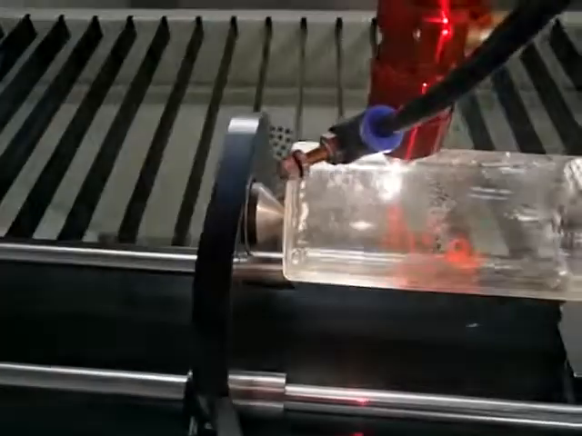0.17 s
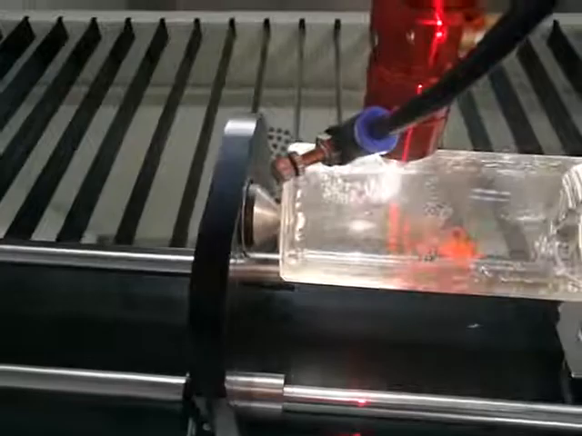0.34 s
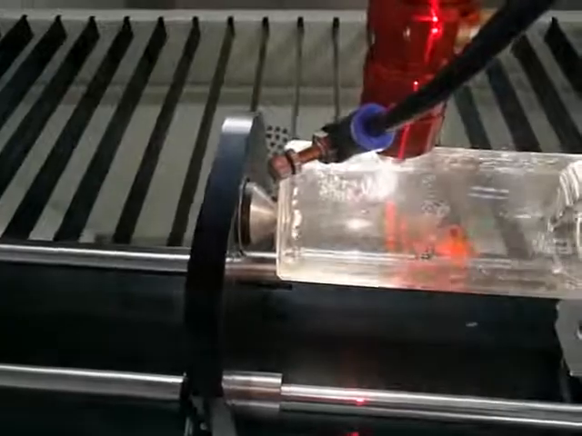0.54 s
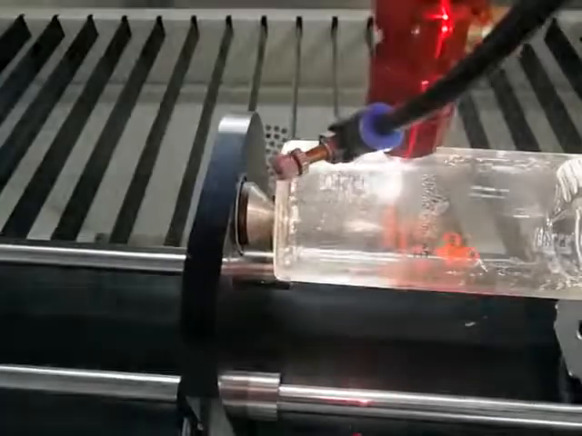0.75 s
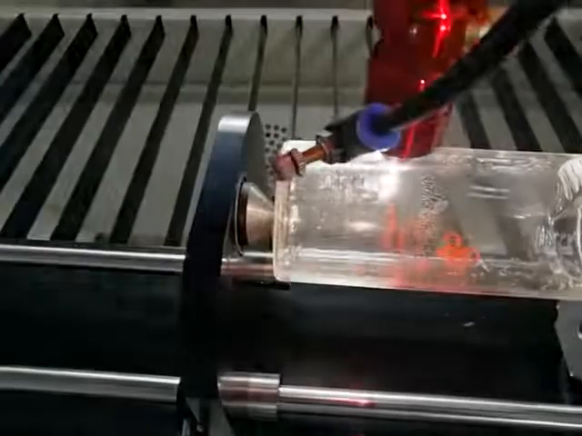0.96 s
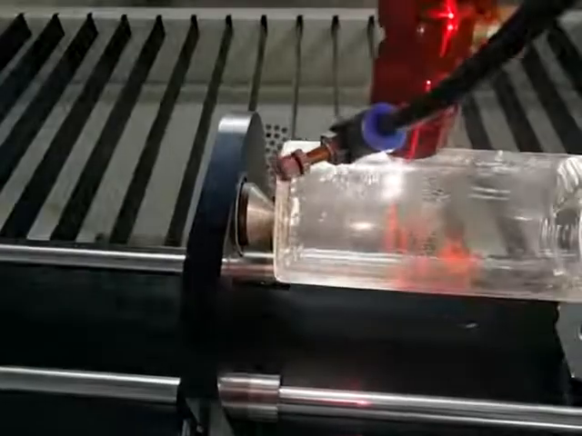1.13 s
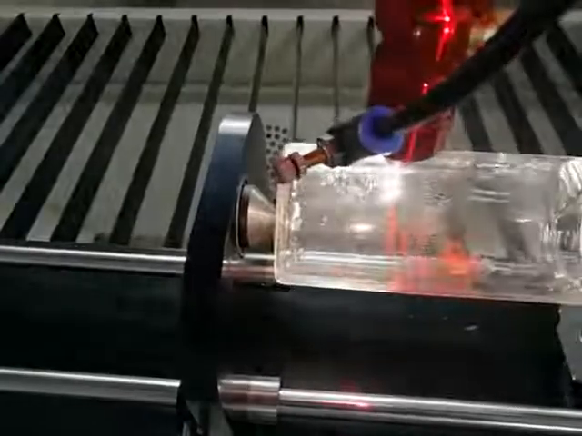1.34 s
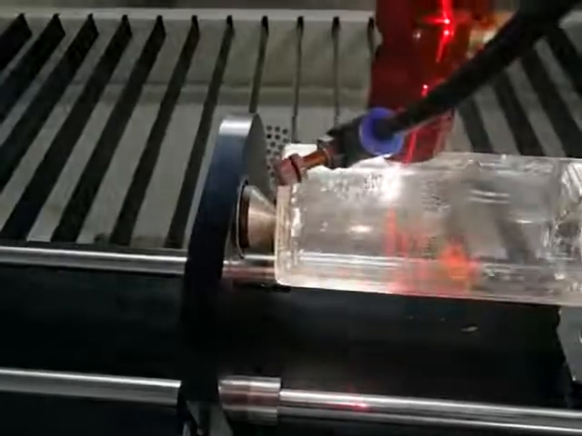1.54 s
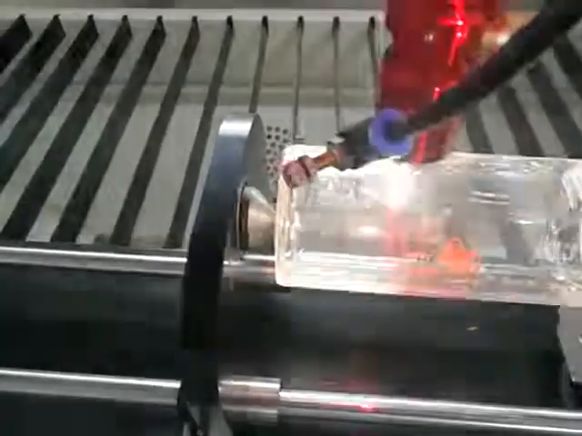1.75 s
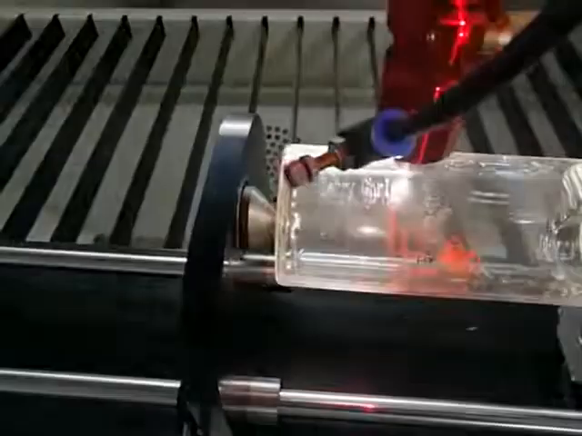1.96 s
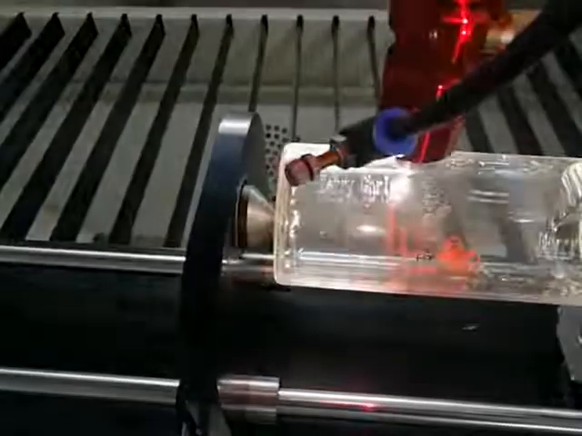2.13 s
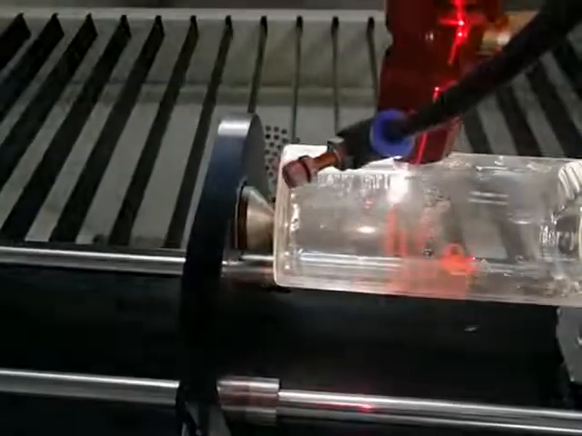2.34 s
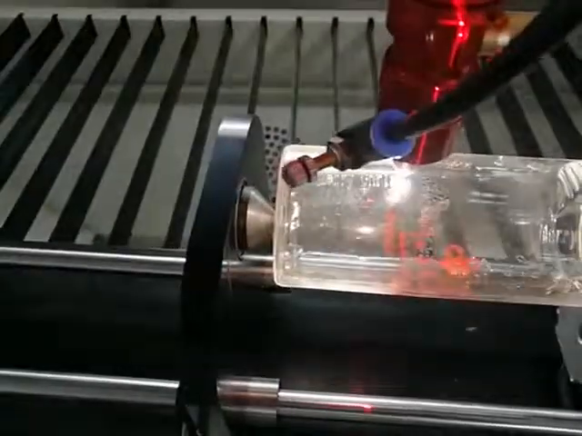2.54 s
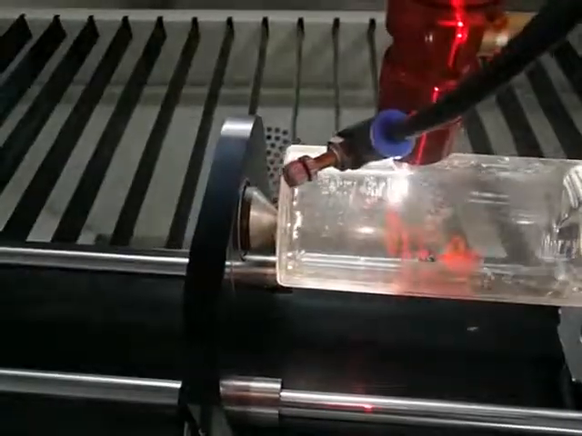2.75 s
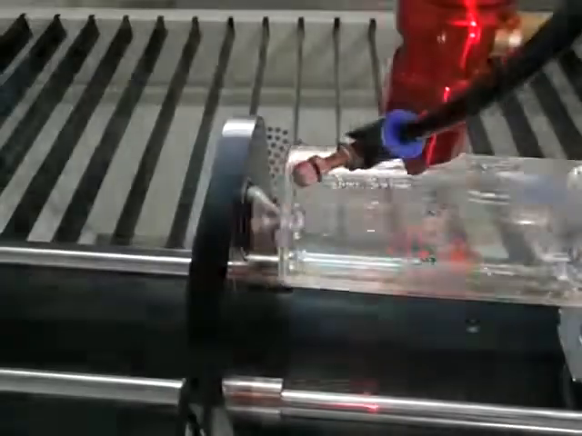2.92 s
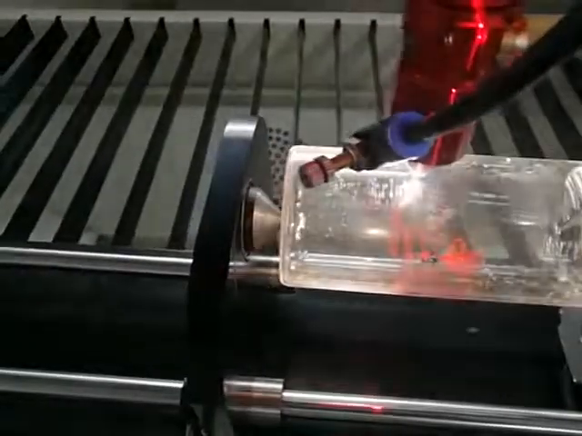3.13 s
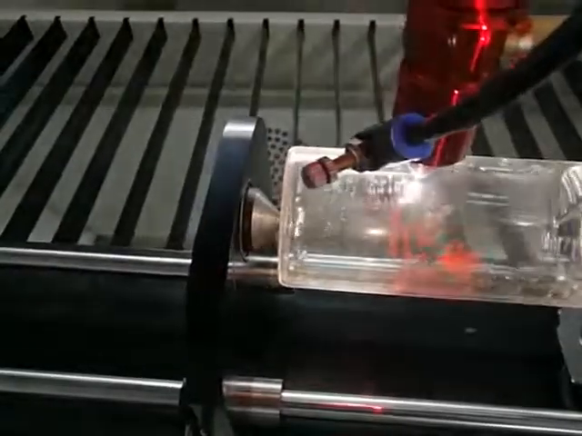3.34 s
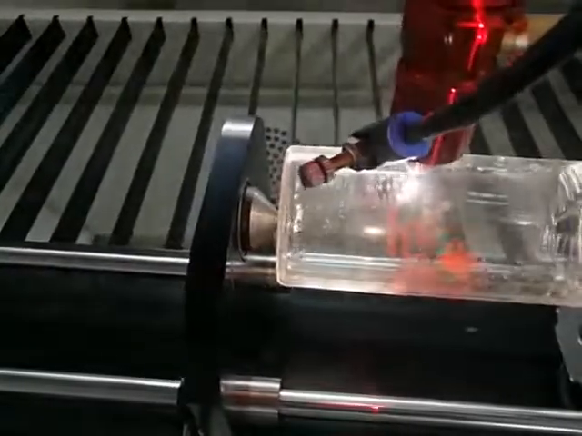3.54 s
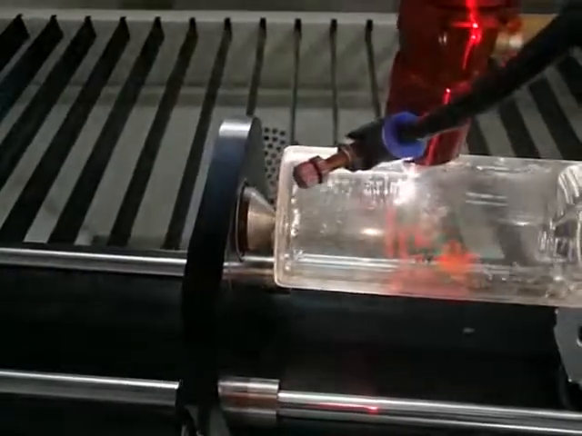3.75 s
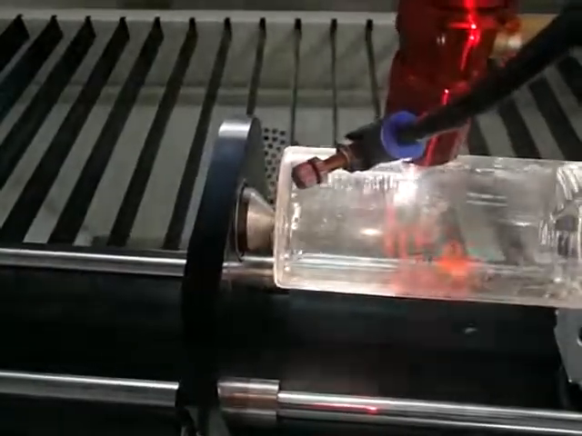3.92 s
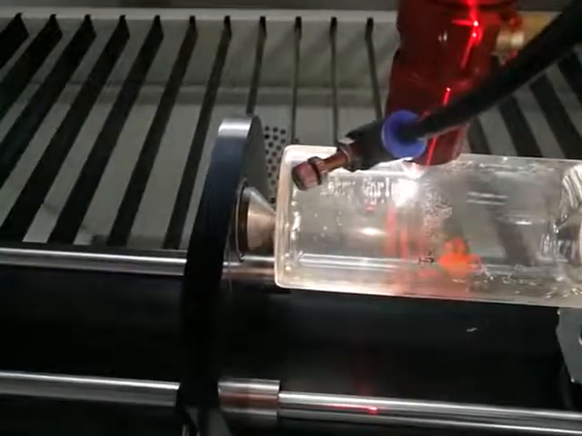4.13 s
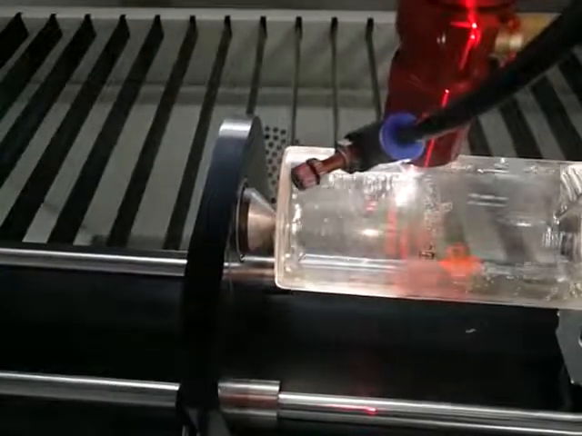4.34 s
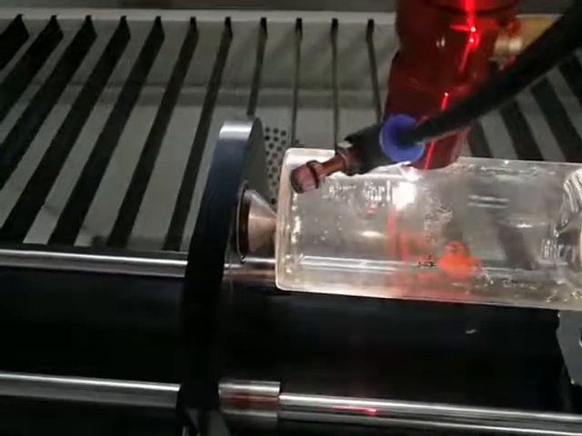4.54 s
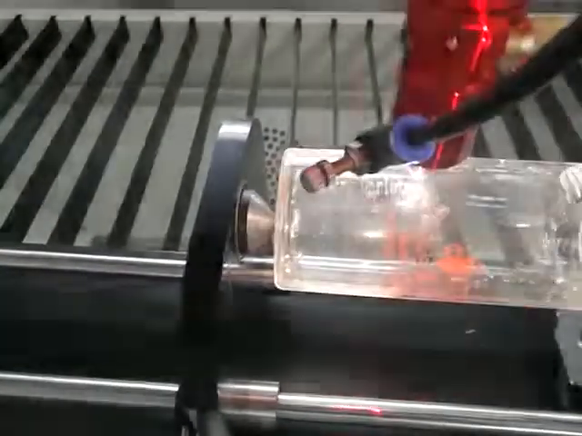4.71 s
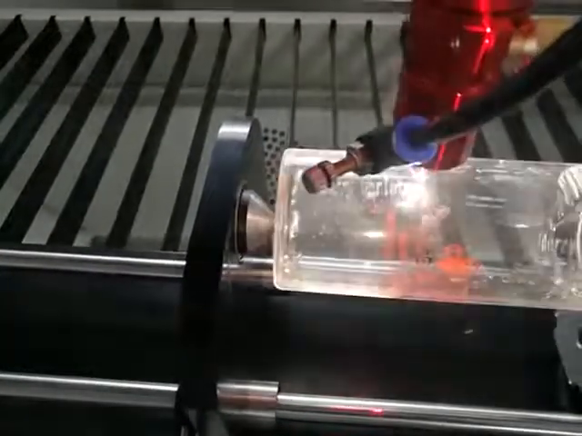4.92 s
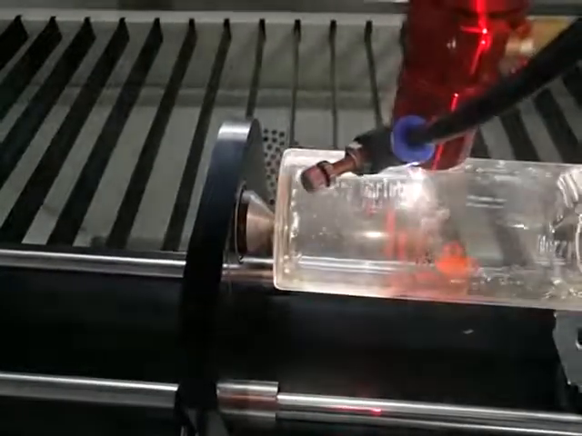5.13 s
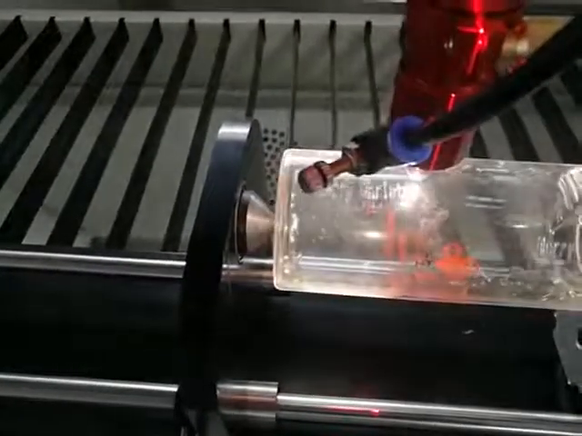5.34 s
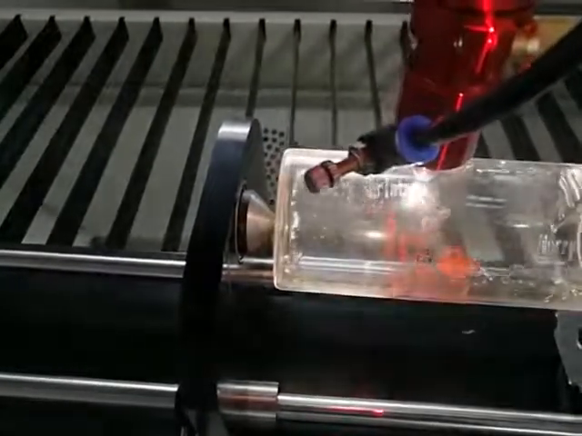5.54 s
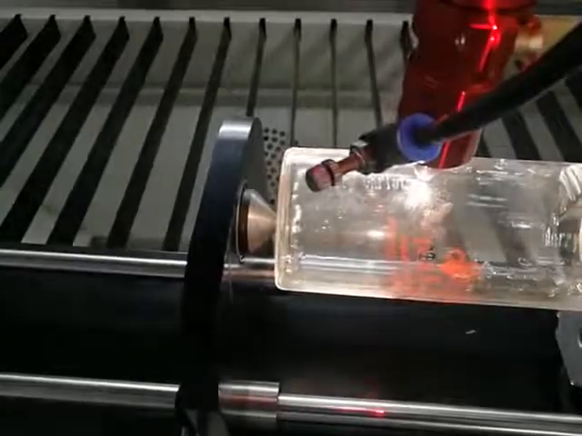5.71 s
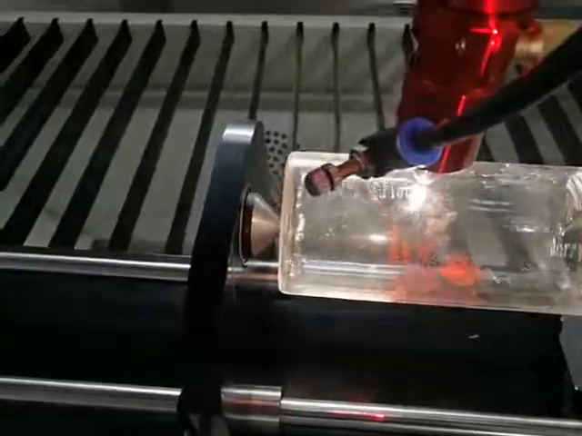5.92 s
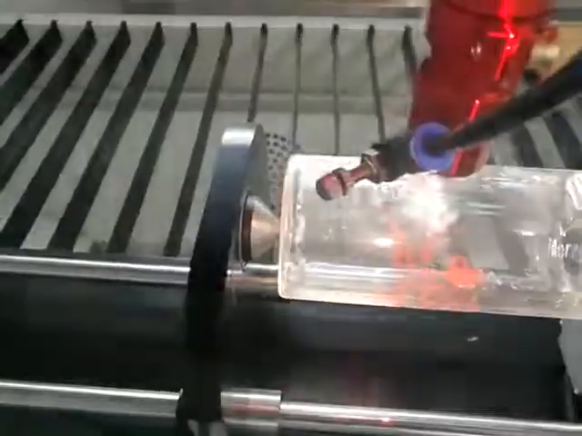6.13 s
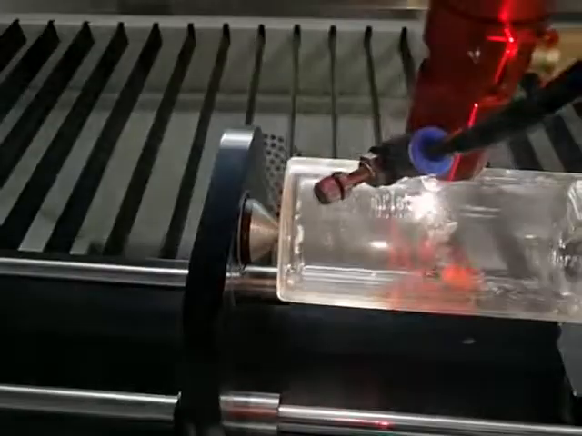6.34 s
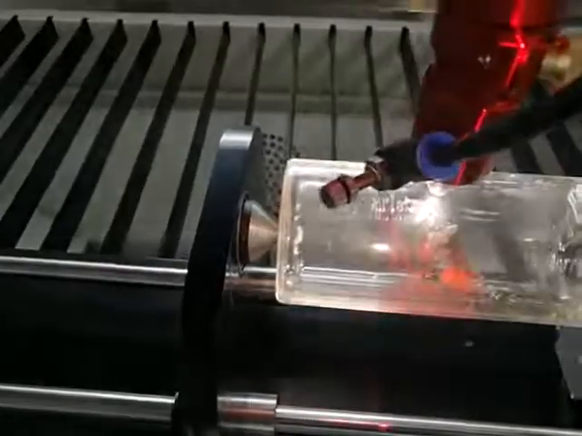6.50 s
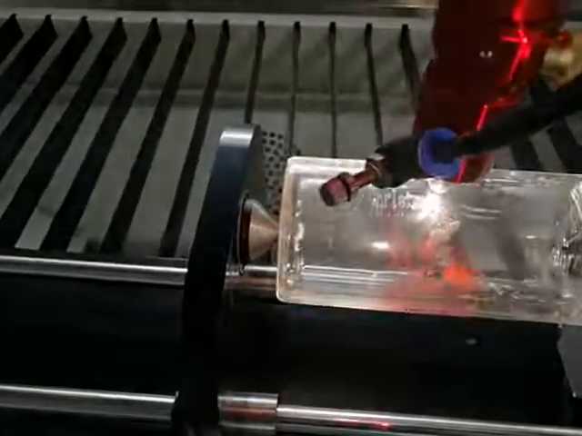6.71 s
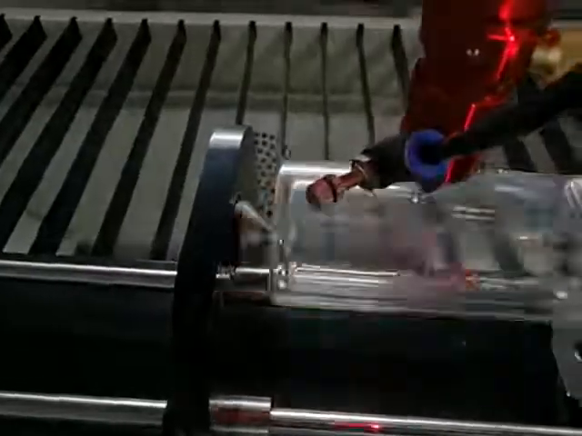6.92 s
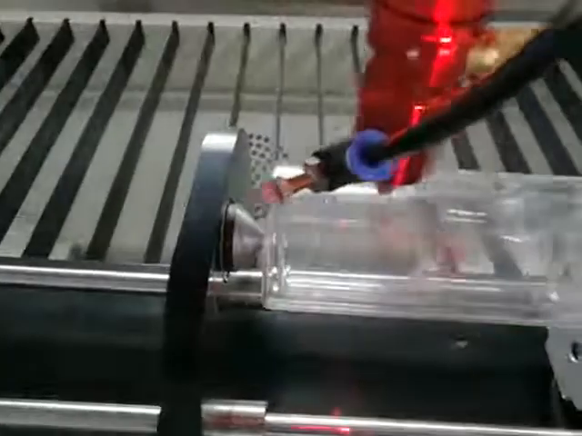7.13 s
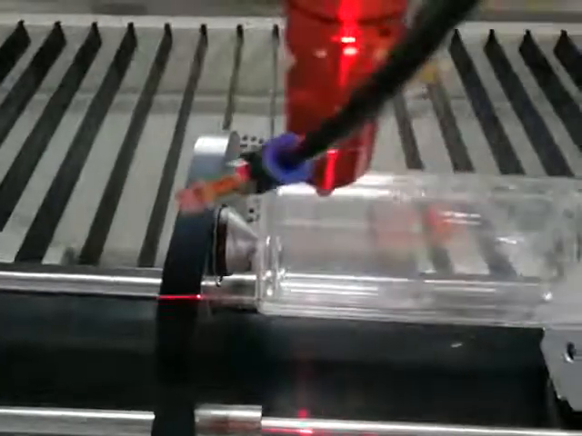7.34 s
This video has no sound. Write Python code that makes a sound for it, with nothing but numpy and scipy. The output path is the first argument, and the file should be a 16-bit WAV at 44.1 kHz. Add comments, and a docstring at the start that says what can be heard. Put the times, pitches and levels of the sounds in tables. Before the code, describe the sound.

Loud, gritty hissing stops and restarts as a laser engraves glass, while an air pump thrums and an exhaust fan rumbles.

```python
"""A loud, fluttering hiss comes and goes: a laser engraver is marking a turning glass bottle.
An air pump thrums and ticks, and its pulsing jet hisses wherever the beam works the glass.
Each pass swells and then weakens, with short pauses between. An exhaust fan rumbles underneath,
one puff of air buffets the microphone above the open cabinet, and at the end the head rolls away."""
import sys
import numpy as np
from scipy import signal
from scipy.fft import rfft, irfft
from scipy.io import wavfile
from scipy.ndimage import uniform_filter1d

SR = 44100
rng = np.random.default_rng(int(sys.argv[2]) if len(sys.argv) > 2 else 0)


def log_audio(samples):
    """Write samples as a 16-bit WAV file to the path given in sys.argv[1]."""
    # one column per channel
    frames = np.atleast_2d(samples).T
    # limit to full scale, then quantise
    limited = np.clip(frames, -1, 1)
    pcm = np.round(limited * 32767).astype(np.int16)
    wavfile.write(sys.argv[1], SR, pcm)


N = 325010
TIME = np.arange(N) / SR
FREQ = np.maximum(np.fft.rfftfreq(N, 1 / SR), 1)

# The tone of the hiss on the glass. Each row: frequency in Hz, relative level in dB.
HISS_TONE = [(300, -42), (700, -25), (1100, -19.5), (1400, -16.5), (1650, -8), (1950, -1), (2300, -1),
             (3500, 0.5), (4200, 0), (4750, 1.4), (5200, 1.5), (5800, 3.5), (6300, 0.5), (7500, 0.5)]
# Resonances, where the air rings between nozzle, bottle and cabinet.
# Each row: frequency in Hz, width in Hz, left boost in dB, right boost in dB.
RESONANCES = [(1550, 100, 3, 3), (1900, 150, 1.5, 3), (2220, 150, 3, 3.5), (2500, 150, 3, 3.5),
              (2874, 180, 6, 8.5), (3225, 120, 4.5, 6), (3720, 130, 2, 3), (4080, 140, 3, 5),
              (4270, 130, 0, 4), (4570, 140, 4.5, 1), (5230, 180, 3, 1), (5520, 100, 0, 4),
              (5770, 130, 4.5, 0), (6050, 130, 2, 0), (6900, 100, 1, 2)]
# How the jet reaches the two sides. Each row: frequency in Hz, pan (left minus right) in dB,
# likeness (0 or less is unrelated, 1 is alike), how far the left leads in radians.
JET_STEREO = [(300, 2.5, 1, -13), (634, -8, 0, 3.5), (1280, -1.5, 0.8, -4), (1530, -1.5, 0.7, 0.5),
              (1980, -5.5, 0.42, -1.8), (2630, -3.5, 0.87, 0.3), (3400, -0.5, 1, -1.5),
              (3920, -7.5, 0.8, -0.5), (4490, 0, 0.6, 2), (5130, 2.5, 0.7, 2.4), (5050, 11, 0.8, 5.5),
              (5366, 1.5, 0.98, 1), (5950, 6, 0.6, 5), (6070, -2, 0.22, 3), (7230, -6, 0.4, 4)]
# Passes of the beam. Each row: start, stop and fade-in in seconds, gain in dB, seconds until it
# weakens, surge just before that in dB (a dip if negative), pan in dB, pan once weakened in dB.
BEAM_PASSES = [(-.01, 0.297, 0.018, -28.5, 0.28, 1.5, 2, 1.5), (0.372, .609, 0.033, -27, .22, -0.5, 1, 1),
               (0.731, 1.635, 0.054, -28, .56, 0, 2, 5), (1.721, 2.875, 0.021, -29, 0.72, -1, 2, 2),
               (2.975, 4.588, .007, -28.5, .68, 0.5, 1.5, 4), (4.748, 5.059, 0.038, -27, 0.3, -0.3, 2, 5),
               (5.115, 5.985, 0.043, -28.5, 0.78, -1.5, 1.5, -1), (6.089, 6.943, 0.029, -29, .33, 2, .7, 0)]
# The jet blowing into free air. Each row: frequency in Hz, relative level in dB, likeness.
FREE_JET_TONE = [(100, -18, .8), (400, -11.5, 0.1), (655, -6, .1), (930, 0, 0.3), (1230, 0, 1),
                 (1600, 1, 0.7), (2040, 4.5, 0.1), (2480, 2, 0.2), (2670, 3, 0.4), (3400, -2, 0.3),
                 (4400, -6, -0.5), (5200, -1.5, 0.09), (6100, -8, 0.08), (7500, -11.5, 0.16)]
# One stroke of the air pump. Each row: frequency in Hz, relative level in dB.
STROKE_TONE = [(20, 3.5), (50, 0.5), (100, -2.5), (150, -11), (200, -9), (290, -24.5), (360, -13),
               (480, -34.5), (600, -20.5), (680, -35.5), (770, -17.5), (1080, -20), (1400, -27),
               (3500, -37.5)]
# The gusts of the puff. Each row: start in seconds, hold in seconds, rumble in dB, rustle in dB.
PUFF_GUSTS = [(3.91, 0.12, -22, -31), (4.179, 0.038, -29.5, -44.5)]
# The puff's big swirls of air. Each row: frequency in Hz, relative level in dB, likeness.
PUFF_RUMBLE_TONE = [(30, -19, 1), (80, -12, 1), (120, -3, .97), (165, 3, .95), (200, -1, .9),
                    (235, -8, .85), (272, -5, .85), (310, -14, .7), (370, -10, .4), (600, -23, 0),
                    (1500, -45, 0)]
# The puff's small swirls. Each row: frequency in Hz, relative level in dB.
PUFF_RUSTLE_TONE = [(60, -25), (200, -10), (330, -8), (460, -2), (650, -3.5), (1100, .5), (1500, -1),
                    (2000, -2.5), (4000, -12), (7500, -22)]
# The exhaust fan. Each row: frequency in Hz, relative level in dB.
FAN_TONE = [(20, -12), (45, -6), (70, -5), (95, -0.5), (115, -3.5), (150, 3), (185, -5), (230, -11),
            (275, -13), (300, -13), (335, -9.5), (420, -17), (550, -26), (1000, -37.5)]
# The fan's slow swell. Each row: time in seconds, gain in dB.
FAN_GAIN = [(.45, -47.5), (.72, -42.5), (1.22, -38), (1.8, -42.5), (2.7, -43.5), (3.7, -42), (4.7, -39),
            (5.1, -42.5), (7.3, -41)]
# The head's rollers on their rail. Each row: frequency in Hz, relative level in dB.
ROLLER_TONE = [(100, -9.5), (380, 4), (520, -1.5), (900, 1), (1150, -4), (1450, -15), (2500, -17),
               (5000, -30)]

PUMP_HZ, FIRST_STROKE_S = 49.967, .0188
SIDES = np.array([[.5], [-.5]])  # splits a difference: half up on the left, half down on the right


def engraving(gain, bright_db, treble_db=5.9, split_hz=4700, flicker_db=1.27, grit_db=0.68):
    """The jet hisses on the glass, fluttering with the pump and flickering as the surface frosts."""
    boost_db = sum(np.array([[left], [right]]) * .5 ** ((2 * (FREQ - hz) / width) ** 2)
                   for hz, width, left, right in RESONANCES)
    hiss = turbulence(shape(HISS_TONE) + boost_db, likeness=shape(JET_STEREO, column=2),
                      pan_db=shape(JET_STEREO), lead=shape(JET_STEREO, column=3))
    hiss = flare(hiss)
    body = irfft(rfft(hiss) / (1 + (FREQ / split_hz) ** 20), N)
    # the tiny swirls that make the treble follow the pump less closely, and flicker on their own
    treble = level(hiss - body, treble_db) * airflow(depth_db=1.1)
    treble *= undb(bright_db + flicker_db * wander(50) + grit_db * wander(1500))
    body = level(body, 0) * airflow(depth_db=1.51)
    body *= undb(flicker_db * wander(50) + grit_db * wander(900))
    return (body + treble) * gain


def beam(warm_s=.08, surge_lead_s=.055, surge_width_s=.055, weaken_s=.06, cut_s=.024):
    """Each pass starts soft on cold glass, fills out as it heats, then turns weaker and duller."""
    cold_db, cold_treble_db = -2.5, -0.5
    weak_db, weak_treble_db = -2, -1.0
    gain, bright_db = np.zeros((2, N)), np.zeros(N)
    for start, stop, fade_in, db, full_s, surge_db, pan_db, weak_pan_db in BEAM_PASSES:
        on = ramp(start - fade_in / 2, fade_in) * (1 - ramp(stop - cut_s / 2, cut_s))
        cold = np.exp(-np.maximum(TIME - start, 0) / warm_s)
        surge = np.exp(-((TIME - start - full_s + surge_lead_s) / surge_width_s) ** 2)
        weak = ramp(start + full_s - weaken_s / 2, weaken_s)
        side_db = SIDES * (pan_db + weak * (weak_pan_db - pan_db))
        gain += on * undb(db + cold_db * cold + surge_db * surge + weak_db * weak + side_db)
        bright_db += on * (cold_treble_db * cold + weak_treble_db * weak)
    return gain, bright_db


def flare(hiss, depth_db=1.62, per_s=22, width_hz=240):
    """As the bottle turns, each resonance grows and fades on its own."""
    flared = hiss
    for hz, *_ in RESONANCES:
        band = signal.lfilter(*signal.iirpeak(hz, hz / width_hz, fs=SR), hiss)
        flared = flared + band * (undb(depth_db * wander(per_s)) - 1)
    return flared


def airflow(depth_db, delay_s=0.0081):
    """The air at the nozzle surges a moment after every pump stroke."""
    return undb(depth_db * np.cos(2 * np.pi * PUMP_HZ * (TIME - FIRST_STROKE_S - delay_s)))


def chips(gain, relative_db=-10, per_s=200, spread_db=4):
    """Tiny flakes crack off the heated glass and give the hiss its grit."""
    sizes = undb(spread_db * np.minimum(rng.exponential(size=N), 4))
    signs = np.sign(rng.standard_normal(N))
    cracks = sizes * signs * (rng.random(N) < per_s / SR)
    pair = np.array([ring(cracks, shape(HISS_TONE) + side * shape(JET_STEREO)) for side in SIDES])
    return level(pair, relative_db) * gain


def free_jet(db=-39.0, waver_db=-1.8):
    """The nozzle alone makes a softer hiss, which goes on through the pauses."""
    hiss = turbulence(shape(FREE_JET_TONE), likeness=shape(FREE_JET_TONE, column=2),
                      pan_db=0.85 * shape(JET_STEREO))
    return hiss * airflow(depth_db=3.0) * undb(db + waver_db * wander(11))


def pump(db=-39.0, scatter_db=0.5, waver_db=1.76, tick_hz=720, tick_width_hz=450):
    """The pump strokes once per cycle of mains power, making a low thrum with a valve tick."""
    strokes = np.zeros(N)
    times = np.arange(FIRST_STROKE_S, TIME[-1], 1 / PUMP_HZ)
    strokes[(times * SR).astype(int)] = -undb(scatter_db * rng.standard_normal(len(times)))
    thrum = ring(strokes - strokes.mean(), shape(STROKE_TONE))
    pan_db, lead = -5, -1.3  # the tick is louder and earlier on the right
    tick_sides = SIDES * np.exp(-(2 * (FREQ - tick_hz) / tick_width_hz) ** 2)
    pair = irfft(rfft(thrum) * undb(tick_sides * pan_db) * np.exp(1j * tick_sides * lead), N)
    return level(pair, db) * undb(waver_db * wander(9))


def puff(waver_db=0.8, coarse_db=2.0, lag_s=.03):
    """A push of air rumbles on the microphone; small swirls then rustle on each side and linger."""
    rumble = turbulence(shape(PUFF_RUMBLE_TONE), likeness=shape(PUFF_RUMBLE_TONE, column=2))
    rumble *= undb(waver_db * wander(77))
    rustle = turbulence(shape(PUFF_RUSTLE_TONE), likeness=0)
    rustle *= undb(coarse_db * np.array([wander(120), wander(120)]))
    return sum(rumble * undb(rumble_db) * gust(start, hold_s, fall_db_per_s=102)
               + rustle * undb(rustle_db) * gust(start + lag_s, hold_s, fall_db_per_s=41.5)
               for start, hold_s, rumble_db, rustle_db in PUFF_GUSTS)


def gust(start, hold_s, fall_db_per_s, rise_s=.07):
    """One gust builds, holds and dies away."""
    falling_s = np.maximum(TIME - start - rise_s - hold_s, 0)
    return ramp(start, rise_s) * undb(-fall_db_per_s * falling_s)


def fan(boost_db=2, alike_hz=430, surge_db=1.7):
    """The exhaust rumbles and surges unevenly in the cabinet; its bass is alike on both sides."""
    rumble = turbulence(shape(FAN_TONE), likeness=1 / (1 + (FREQ / alike_hz) ** 3))
    swell_db = np.interp(TIME, *np.transpose(FAN_GAIN))
    return rumble * undb(boost_db + swell_db + surge_db * wander(25))


def carriage(db=-47, rough_db=3.0, start_s=6.96, rise_s=.07):
    """The laser head rolls off along its rail after the last pass."""
    rolling = turbulence(shape(ROLLER_TONE), likeness=.1, pan_db=-3)
    return rolling * undb(db + rough_db * wander(65)) * ramp(start_s, rise_s)


def turbulence(tone_db, likeness, pan_db=0, lead=0):
    """Rushing noise in stereo: both sides share the direct sound but get different reflections."""
    shared, left, right = rfft(rng.standard_normal((3, N)))
    likeness = np.clip(likeness, 0, 1)
    pair = np.sqrt(likeness) * shared + np.sqrt(1 - likeness) * np.array([left, right])
    spectrum = pair * undb(tone_db + SIDES * pan_db) * np.exp(1j * SIDES * lead)
    return level(irfft(spectrum, N), 0)


def ring(hits, tone_db):
    """An object rings with the given tone each time it is hit."""
    cepstrum = irfft(np.log(undb(tone_db)), N)
    # folding the second half onto the first puts the ringing after each hit, never before
    cepstrum[1:N // 2] *= 2
    cepstrum[N // 2 + 1:] = 0
    return irfft(rfft(hits) * np.exp(rfft(cepstrum)), N)


def wander(per_s):
    """A smooth random wobble, about 1 in size, that heads for a new value per_s times a second."""
    hold = int(SR / per_s)
    steps = np.repeat(rng.standard_normal(N // hold + 1), hold)
    smooth = uniform_filter1d(uniform_filter1d(steps, hold), hold)
    return level(smooth[:N], 0)


def shape(rows, column=1):
    """Spread one column of a table over all frequencies, on a scale of octaves."""
    rows = np.asarray(rows)
    return np.interp(np.log(FREQ), np.log(rows[:, 0]), rows[:, column])


def ramp(start, length):
    """A straight rise from 0 to 1."""
    return np.clip((TIME - start) / length, 0, 1)


def level(x, db):
    """Set the average (rms) level."""
    return x * undb(db) / np.sqrt(np.mean(x ** 2))


def undb(db):
    """Turn decibels into a number to multiply by."""
    return 10 ** (np.asarray(db) / 20)


def scene():
    """Add up all the sounds; the beam turns the loud hiss and its grit on and off."""
    gain, bright_db = beam()
    return engraving(gain, bright_db) + chips(gain) + free_jet() + pump() + fan() + carriage() + puff()


def record(dry, top_hz=7520):
    """Cut away the highest treble steeply."""
    return signal.sosfilt(signal.ellip(14, .1, 85, top_hz, fs=SR, output="sos"), dry)


dry = scene()
out = record(dry)
log_audio(out)
```